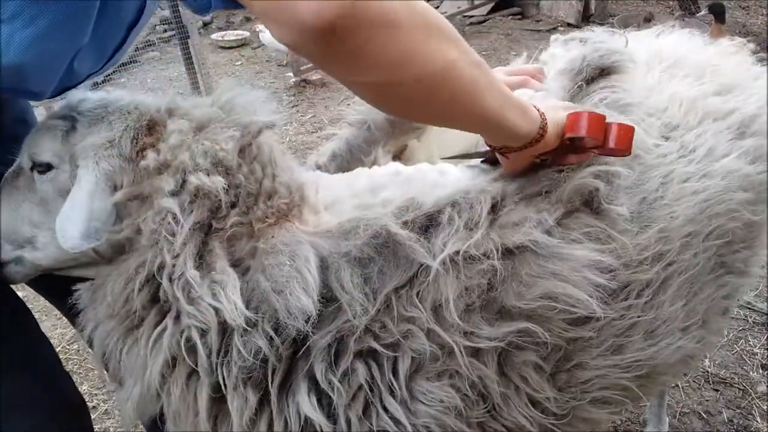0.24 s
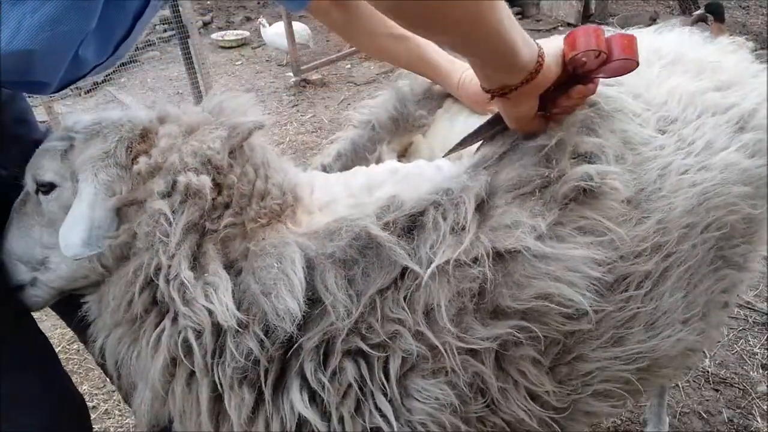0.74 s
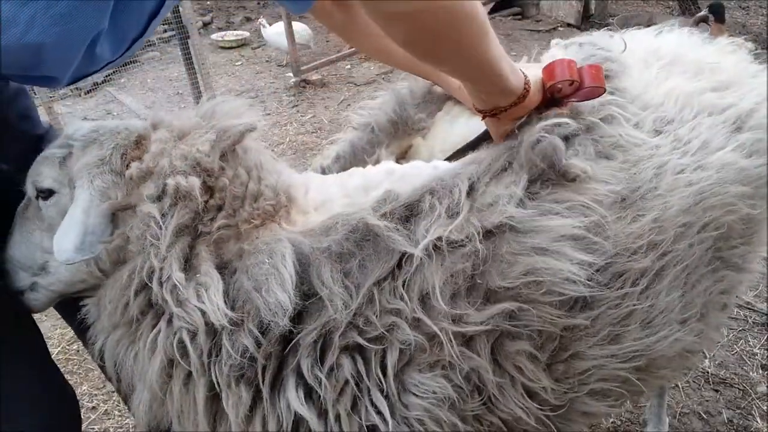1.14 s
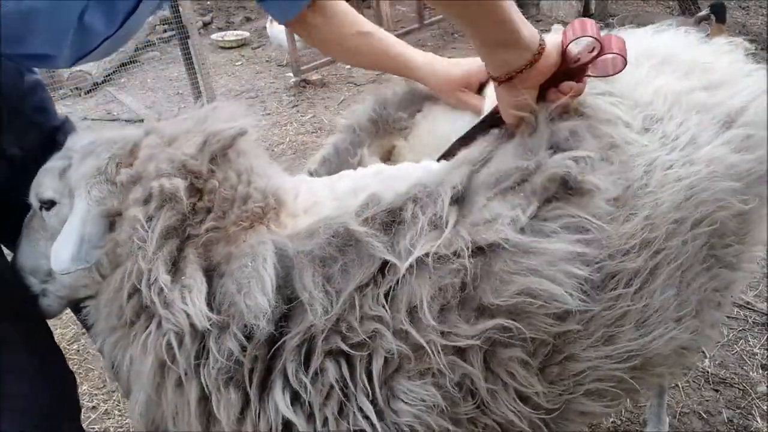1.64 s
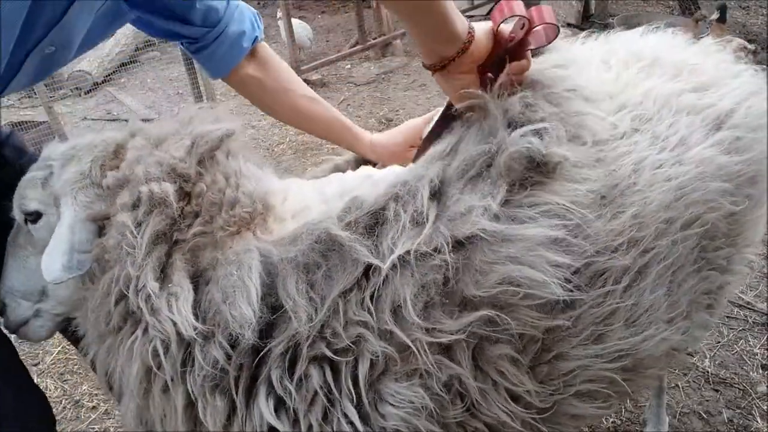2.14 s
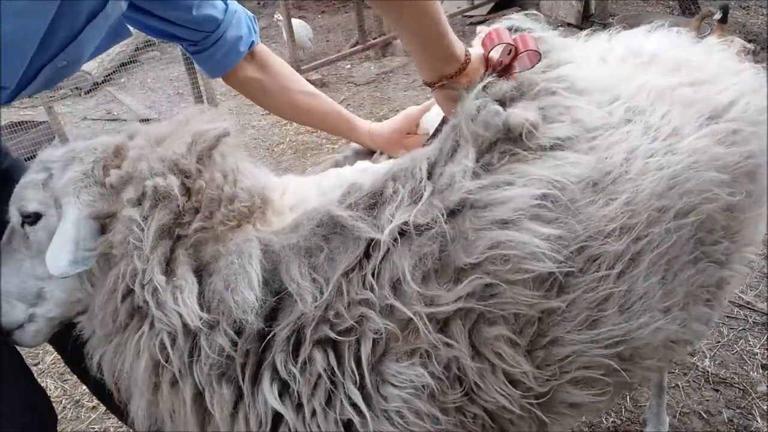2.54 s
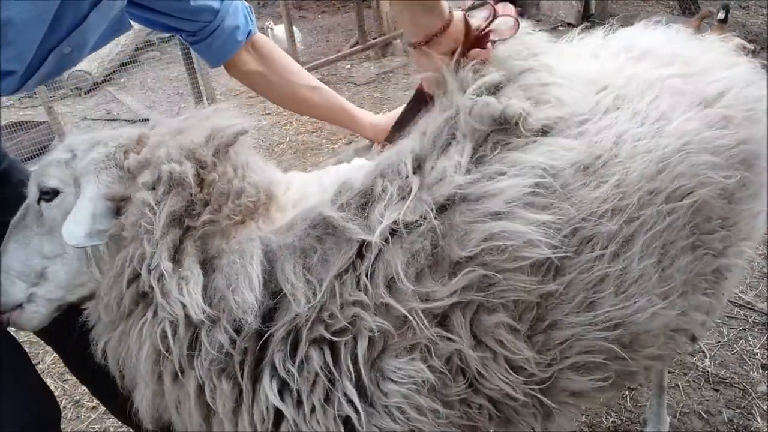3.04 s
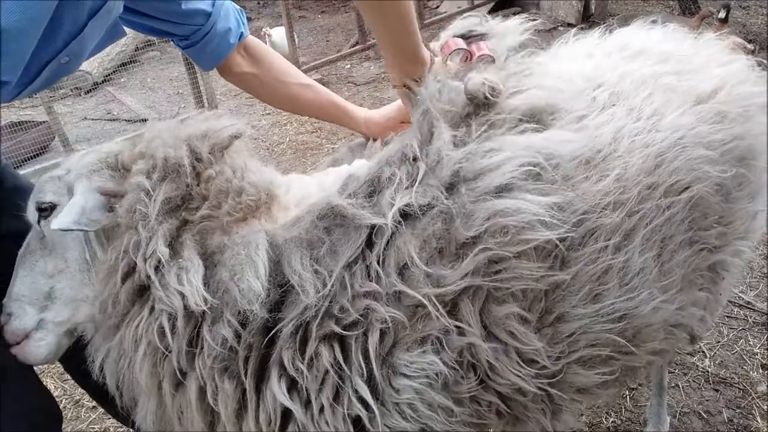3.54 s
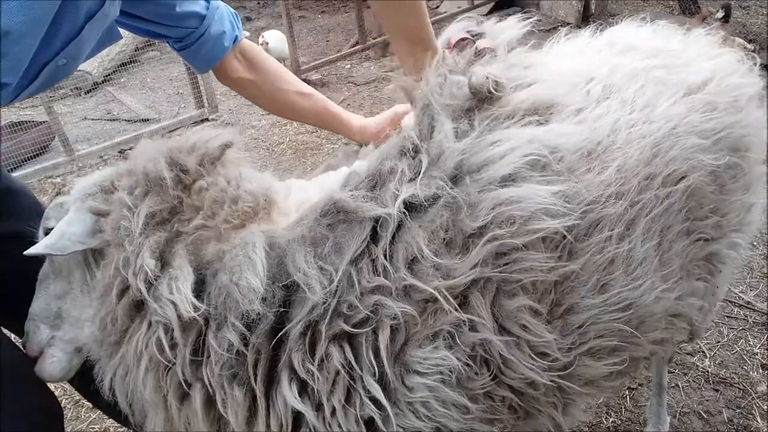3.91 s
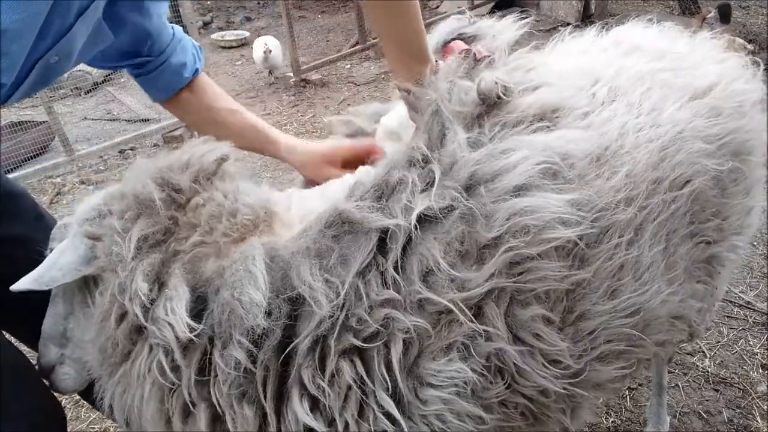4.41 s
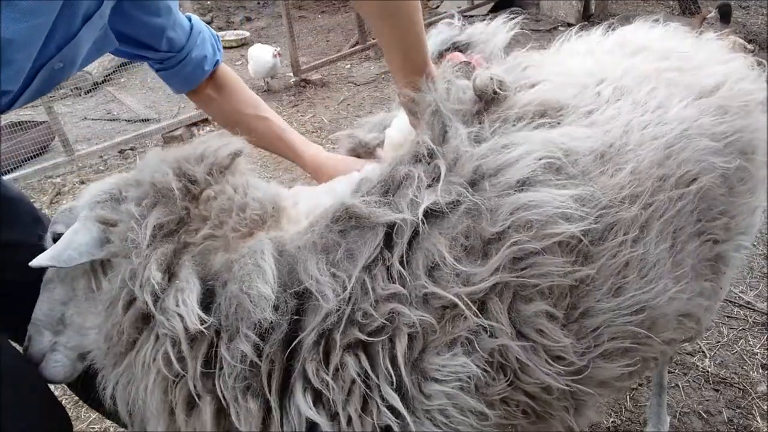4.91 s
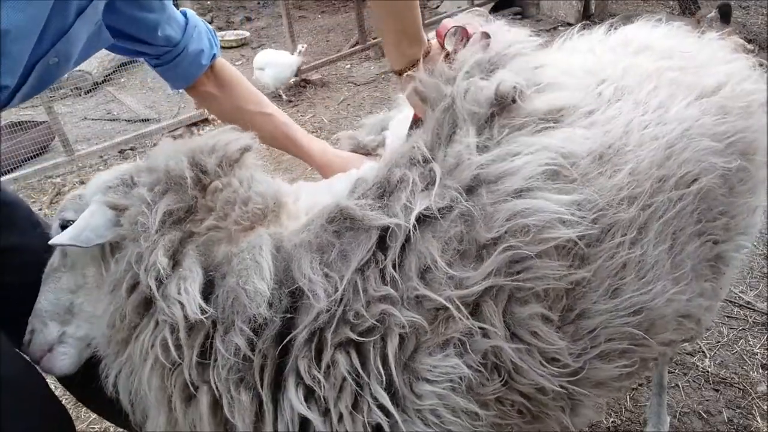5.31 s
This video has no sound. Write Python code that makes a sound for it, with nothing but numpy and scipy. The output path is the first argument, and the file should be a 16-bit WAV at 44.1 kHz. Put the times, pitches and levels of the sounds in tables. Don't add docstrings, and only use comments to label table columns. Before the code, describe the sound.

Close metallic shear snips and springy scrapes through thick fleece, soft wool rustle, low wind thumps and a few distant poultry calls outdoors.

```python
import sys
import numpy as np
from scipy import signal
from scipy.fft import rfft, irfft, next_fast_len
from scipy.io import wavfile
from scipy.ndimage import uniform_filter1d

SR = 44100
rng = np.random.default_rng(int(sys.argv[2]) if len(sys.argv) > 2 else 0)


def natural_amplitude(level_db):
    exponent = np.asarray(level_db, float) / 20
    return 10 ** exponent


def pcm_store(signal):
    levels = np.round(np.clip(np.atleast_2d(signal), -1, 1) * 32767)
    wavfile.write(sys.argv[1], SR, levels.astype(np.int16).T)


N = 245195


def evened(x):
    return x / np.sqrt(np.mean(x ** 2) + 1e-20)


def read(points, hz):
    f, value = np.transpose(points)
    return np.interp(np.log(hz + 1), np.log(f + 1), value)


def columns(rows, t):
    s, *rest = np.transpose(rows)
    return [np.interp(t, s, c) for c in rest]


def add(mix, s, sound):
    part = mix[max(round(s * SR), 0):][:len(sound)]
    part += sound[:len(part)]


def noise(n=N):
    return rng.standard_normal(n)


def butter(x, order, hz, kind="low"):
    return signal.sosfilt(signal.butter(order, hz, kind, fs=SR, output="sos"), x)


def colour(x, points):
    size = next_fast_len(len(x) + 512)
    gain = natural_amplitude(read(points, np.fft.rfftfreq(size, 1 / SR)))
    return irfft(rfft(x, size) * gain, size)[:len(x)]


def resonate(x, hz, width):
    turn = np.exp(2j * np.pi * np.cumsum(hz * np.ones(len(x))) / SR)
    r = np.exp(-np.pi * width / SR)
    return 2 * (turn * signal.lfilter([1 - r], [1, -r], x / turn)).real


def wander(per_s):
    return evened(butter(noise(), 2, per_s))


def patchy(x, patchy_db):
    z = signal.stft(x, nperseg=128)[2]
    patches = uniform_filter1d(rng.standard_normal(z.shape), size=2, axis=0)
    patches = uniform_filter1d(patches, size=6, axis=1)
    return signal.istft(z * natural_amplitude(patchy_db * evened(patches)), nperseg=128)[1][:len(x)]


def tilt(treble_db, bass_db):
    return [(2500, bass_db + 14), (4500, 0), (8000, 0), (10500, treble_db + 6)]


# [(f/Hz, width/Hz, level/dB)]
BLADES = [
    (0, [(2910, 92, -10), (4400, 77, -2.5), (6780, 88, 0), (7740, 23, 1.5), (8480, 39, -6.5), (12800, 53.6, -11), (14600, 50.5, -16)]),
    (1.3, [(4534, 80, 13.5), (5340, 80, 10), (6660, 37, 2), (10220, 105, 8), (12700, 80, -3)]),
    (1.36, [(2750, 164, -11), (3350, 77, -10), (5800, 55, -5), (7350, 54, 0), (8510, 37, -3), (14100, 87, -4)]),
    (2.7, [(5380, 74, 5), (6440, 109, -4), (10260, 140, -8), (13040, 160, -7)]),
    (2.83, [(2370, 200, -18.5), (3560, 69, 2), (6130, 83, -2), (7220, 88, -2), (13150, 47, -10), (14600, 220, -14)]),
    (3.7, [(4523, 59, 1), (5500, 64, 8), (7480, 43, -3.5), (10500, 80, -3), (12670, 64, -7.5), (15530, 63, -9.5)]),
    (4.9, [(2500, 52, -4), (4058, 52, -3), (5880, 117, -7.5), (6720, 163, -11), (8310, 52, -2), (12920, 240, -5.5), (14100, 48, -6.5)]),
]
# [(f/Hz, width/Hz, level/dB)]
OPEN_BLADES = [
    (.55, [(4530, 38, 2.5), (5588, 78, 0), (6380, 63, 0), (7135, 138, -0.5), (8430, 17, -1), (11100, 70, -10), (15620, 41, -12)]),
    (1.55, [(3450, 92, -3), (4424, 39, -5.5), (5337, 47, -5), (6856, 69, 2), (10620, 115, -8), (13000, 38, -13), (15620, 60, -1)]),
    (3.0, [(4450, 40, -14.5), (5400, 51, -6), (6807, 44, -1), (8460, 43, -10), (10200, 160, -11), (15620, 47, -23)]),
    (4.0, [(4230, 120, -5), (4976, 180, 7), (5265, 220, 4), (7900, 80, -12), (10300, 130, -15.5)]),
    (5.12, [(4536, 180, -5), (5268, 62, -7), (6846, 50, -2), (8330, 54, -11), (11000, 55, -18), (13020, 66, -14.5), (15370, 22, -3)]),
]


def ring(x, s, damping):
    modes = [m for start, m in sorted(BLADES + OPEN_BLADES) if start <= s][-1]
    return sum(natural_amplitude(db) * resonate(x, hz, damping * width) for hz, width, db in modes)


SETTLE_DB, SETTLE_T60_S = -22, 0.28
THINNING = 0.64


def slips(rows, rise_s, grain, steel_db, damping, ease):
    out = np.zeros(N)
    t = np.arange(round(.3 * SR)) / SR
    after = np.maximum(t - rise_s, 0)
    swell = np.minimum(t / rise_s, 1) ** ease
    settling = natural_amplitude(SETTLE_DB - 60 * after / SETTLE_T60_S)
    for s, db, treble_db, t60 in rows:
        unevenness = evened(uniform_filter1d(noise(len(t)), size=55))
        snaps = noise(len(t)) * natural_amplitude(1.9 * unevenness)
        shape = swell * (natural_amplitude(-60 * after / max(t60, .02)) + settling)
        force = colour(snaps, tilt(treble_db, -23.5 - THINNING * db)) * shape
        scrape = patchy(colour(force, grain), patchy_db=4.5)
        steel = ring(snaps * shape, s, damping)
        sound = (scrape + natural_amplitude(steel_db) * steel) / abs(scrape).max()
        add(out, s - rise_s - .001, natural_amplitude(db - 6.0) * sound)
    return out


# peak t/s, peak level/dB, treble/dB, t60/s
JERKS = [(0.3564, -28, -11, 0.28), (0.3932, -18.5, -9, 0.29), (0.421, -15, -5, 0.12),
         (0.438, -9.5, -19.5, 0.02), (1.339, -38.5, -11, 0.077), (1.3788, -30, -7.5, 0.054),
         (1.4008, -8.5, -11.5, 0.078), (2.803, -27, -45, 0.107), (2.844, -18.5, -12, 0.066),
         (2.867, -15.5, -7, 0.19), (2.8884, -11, -17.5, 0.047), (3.7859, -33, -6, 0.22),
         (3.8095, -30.5, -8.5, 0.18), (3.8326, -24.5, -8, 0.033), (4.9382, -37, -20, 0.073),
         (4.947, -29.5, -13.5, 0.34), (4.988, -23, -5.5, 0.095), (5.005, -6.5, -5.5, 0.028),
         (5.031, -15, -16.5, 0.15)]
# f/Hz, level/dB per Hz
SCRAPE = [(710, -69.5), (1200, -50), (3260, -16.5), (4380, -11), (4990, -10), (5390, -9.5), (6220, -10.5),
          (6940, -2.5), (9030, -19), (10300, -11), (11700, -14.5), (16000, -12), (16500, -36)]


def jerks():
    return slips(JERKS, .015, SCRAPE, steel_db=-3.0, damping=2.5, ease=1.6)


# peak t/s, peak level/dB, treble/dB, t60/s
SPRINGS = [
    (0.6026, -8.5, -7, 0.068),
    (1.5885, -17, -21.5, 0.029),
    (3.0475, 0.5, -9.5, 0.047),
    (4.0744, -30, -15.5, 0.079),
    (4.1071, -36.5, -15, 0.089),
    (5.170, -4.5, -6, 0.071),
]
# f/Hz, level/dB per Hz
SPRING_SCRAPE = [(710, -76.5), (1200, -51.5), (4390, -10.5), (5000, -14.5), (5390, 0.5), (6010, -18.5),
                 (6930, -6.5), (9500, -20.5), (16200, -18)]


def springs():
    return slips(SPRINGS, .013, SPRING_SCRAPE, steel_db=0.0, damping=1.14, ease=0.8)


NICK_DAMPING, NICK_T60_S = 1.5, .007
# t/s, peak level/dB, treble/dB, bass/dB
CLACKS = [
    (0.4258, 7.5, -13.5, -53.5),
    (0.4335, -14.5, -4, -17.5),
    (1.4019, 2, -20, -24.5),
    (2.891, 4.5, -5, -18),
    (2.9025, -16, -21, -12),
    (5.0207, 5, -10, -22.5),
    (5.026, -10, -18.5, -31),
]


def clacks():
    out, t = np.zeros(N), np.arange(round(.25 * SR)) / SR
    for s, db, treble_db, bass_db in CLACKS:
        blow = noise(len(t)) * natural_amplitude(-60 * t / .016)
        bass = [(300, bass_db - 18), (1300, bass_db - 11), (2100, 0)]
        crack = colour(blow, bass + tilt(treble_db, bass_db - 8)[1:])
        crack = crack * np.minimum(t * SR / 8, 1)
        knock = resonate(resonate(blow, 2300, 720), 2300, 720)
        steel = ring(blow, s, damping=NICK_DAMPING)
        sound = crack / abs(crack).max()
        sound += natural_amplitude(bass_db + 5) * knock / abs(knock).max()
        sound += natural_amplitude(-5.0) * steel / abs(steel).max()
        add(out, s - .001, natural_amplitude(db - 12.0) * sound)
    return out


# t/s, peak level/dB
NICKS = [(0.3618, -50), (0.399, -31), (0.406, -33), (0.4149, -24.5), (0.435, -2.5), (0.458, -22),
         (0.5941, -20), (0.6026, -16), (0.608, -22.5), (1.3362, -36), (1.3792, -36), (1.396, -23),
         (1.4085, -13), (1.412, -22), (1.5812, -20), (1.5912, -31), (2.809, -31), (2.841, -30),
         (2.8474, -28), (2.8684, -26), (2.9022, -15.5), (3.0383, -15), (3.0587, -19.5), (3.782, -44),
         (3.807, -36), (3.8153, -37.5), (3.831, -36), (4.0736, -30.5), (4.1053, -42.5), (4.9493, -35),
         (4.9636, -35), (4.986, -29), (5.0063, -13), (5.0292, -14.5), (5.166, -16)]


def nicks():
    out, t = np.zeros(N), np.arange(round(.1 * SR)) / SR
    for s, db in NICKS:
        blow = noise(len(t)) * natural_amplitude(-60 * t / NICK_T60_S)
        scrape = colour(blow, SCRAPE) * np.minimum(t * SR / 12, 1)
        sound = scrape + natural_amplitude(-1.0) * ring(blow, s, damping=NICK_DAMPING)
        add(out, s - .0007, natural_amplitude(db) * sound / abs(sound).max())
    return out


# t/s, peak level/dB, f/Hz, snap/dB
TICKS = [(.985, -45.5, 6550, -16), (1.206, -48.5, 10270, -23), (2.07, -38, 1700, -6.5),
         (2.8153, -22.5, 2920, -26), (3.502, -40, 5230, -13), (3.5134, -32, 2000, -33),
         (3.5623, -36, 4960, -14), (3.6384, -26, 5800, -14), (3.708, -37, 10070, -24),
         (3.9464, -47.5, 2060, -19.5), (3.986, -32.5, 2104, -23.5), (4.213, -27, 2230, -27.5),
         (4.397, -52, 9000, -9.5), (5.2827, -47.5, 6800, -6), (5.299, -45.5, 7040, -8),
         (5.348, -38, 5196, -21.5), (5.345, -37.5, 8250, -27)]
# t/s, peak level/dB, f/Hz, snap/dB
GRIT = [
    (1.6876, -37, 4000, -10),
    (1.7704, -34, 5420, -10),
    (1.8702, -41.5, 5800, -12),
    (2.1087, -46, 4000, -15.5),
    (2.1626, -30, 4200, -14),
]


def ticks(rows):
    out, t = np.zeros(N), np.arange(300) / SR
    for s, db, hz, snap_db in rows:
        snap = np.diff(noise(301)) * natural_amplitude(-60 * t / 0.001)
        core = np.sin(2 * np.pi * hz * t) * natural_amplitude(-60 * t / 0.005)
        add(out, s, natural_amplitude(db) * (natural_amplitude(snap_db) * snap + 0.3 * core))
    return out


CRISP_DB, CRISPING = -71.5, 1.1
# t/s, effort level/dB
RUSTLE = [(0.0, -65.5), (0.36, -71.5), (0.52, -60), (0.78, -71.5), (1.05, -68), (1.36, -70.5), (1.55, -62),
          (2.1, -64.5), (2.35, -60), (2.66, -60.5), (2.96, -61.5), (3.19, -63), (3.78, -64.5),
          (4.17, -66.5), (4.7, -73.5), (5.1, -63.5), (5.3, -71.5), (5.56, -68)]
# f/Hz, level/dB per Hz
FLEECE = [(1060, -33), (1800, -0.5), (3200, -4.5), (4220, -2.5), (7100, -5.5), (9200, -12.5), (15200, -11),
          (16000, -19.5), (16500, -34.5)]
# from t/s, to t/s, f/Hz, level/dB over the wool
SINGING = [(.03, .13, 10970, -8), (0, .16, 6700, -7), (.83, 1.2, 10980, -9), (.84, 1.08, 13400, -11),
           (.82, 1.25, 6800, -5), (.96, 1.2, 7750, -7), (2.3, 2.7, 10970, -14), (2.38, 2.76, 6600, -8),
           (3.15, 3.6, 5150, -7), (3.43, 3.6, 11000, -10), (2.3, 2.45, 13300, -15), (5.34, 5.56, 5150, -4),
           (5.2, 5.38, 6790, -5), (2.55, 2.7, 9650, -17)]


def rustle():
    t = np.arange(N) / SR
    body_db = columns(RUSTLE, t)[0]
    treble_db = CRISP_DB + CRISPING * (body_db + 62.5)
    flicker = natural_amplitude(1.6 * wander(30))
    wool = patchy(colour(noise() * flicker, FLEECE), patchy_db=2.0)
    treble = butter(wool, 8, 8800, "high")
    body = butter(wool, 5, [3000, 8600], "band")
    hum = np.zeros(N)
    for from_s, to_s, hz, db in SINGING:
        spell = uniform_filter1d(1. * ((from_s < t) & (t < to_s)), size=1500)
        hum += natural_amplitude(db) * spell * evened(resonate(noise(), hz, 85))
    return natural_amplitude(body_db) * (evened(body) + hum) + natural_amplitude(treble_db) * evened(treble)


# t/s, peak level/dB, length/s
SWEEPS = [
    (1.72, -32, 0.118),
    (2.176, -37.5, 0.17),
    (3.348, -40, 0.2),
    (3.872, -39.5, 0.11),
]
# t/s, peak level/dB, length/s
BRUSHES = [
    (1.678, -39, 0.034),
    (1.862, -39, 0.03),
    (1.97, -43, 0.074),
    (4.41, -47, 0.075),
]


def sweeps(rows):
    out = np.zeros(N)
    for s, db, length in rows:
        hiss = patchy(colour(noise(SR // 4), FLEECE), patchy_db=2.2)[:round(length * SR)]
        add(out, s, natural_amplitude(db - 21.5) * evened(hiss) * signal.windows.tukey(len(hiss), .5))
    return out


def fowl(calls, throat, rough, pitch_hz, sag):
    out = np.zeros(N)
    for s, db, length, gape_db, tone in calls:
        t = np.linspace(0, 1, round(max(length, .03) * SR))
        jitter, strength, hiss = rng.standard_normal((3, SR // 5))[:, :len(t)]
        gape = np.sin(np.pi * t) ** 2
        bend = tone * (1 + sag * (gape - .45 - 0.1 * t))
        shake = 1 + .035 * evened(uniform_filter1d(jitter, size=200))
        turns = np.cumsum(pitch_hz * bend * shake) / SR
        count = np.floor(turns)
        pulses = np.diff(count, prepend=0) * natural_amplitude(1.5 * strength + 3 * (-1) ** count)
        breath = np.exp(-(turns % 1) / 0.42) * hiss
        drive = (1 - rough) * evened(pulses) + rough * evened(breath)
        drive = drive * np.sin(np.pi * t) ** 0.79
        drive, gape, bend = (np.pad(v, (0, 800), "edge") for v in (drive, gape, bend))
        call = np.zeros(len(drive))
        for k, (hz, width, level_db) in enumerate(throat):
            band = resonate(drive, hz * bend, 1.9 * width)
            band = evened(resonate(band, hz * bend, width))
            if k > 1:
                band = band * natural_amplitude(gape_db) * gape
            call += natural_amplitude(level_db) * band
        add(out, s - .006, natural_amplitude(db + 2.5) * call / abs(call).max())
    return out


# t/s, peak level/dB, length/s, gape/dB, throat tuning factor
CACKLES = [(0.1094, -45, 0.081, 1.5, 0.95), (0.455, -43, 0.087, -3, 0.98), (0.546, -41.5, 0.064, 1, 0.89),
           (0.678, -42.5, 0.0807, 1, 0.99), (0.8005, -39, 0.09, -3, 1.007), (1.1455, -48, 0.06, 2.5, 0.97),
           (1.239, -45, 0.086, 0, 0.95), (1.353, -45.5, 0.062, -7, 0.98), (1.511, -46, 0.068, -2, 0.98),
           (1.8505, -40, 0.075, 2, 0.99), (2.0925, -39.5, 0.089, -1.5, 1.04),
           (2.3524, -41.5, 0.066, 0.5, 0.89), (2.5962, -37.5, 0.086, 5, 0.91),
           (2.6883, -38.5, 0.086, 5.5, 0.93), (2.9035, -38, 0.091, 0.5, 1.1),
           (3.0804, -37, 0.09, -0.4, 0.91), (3.3365, -35, 0.091, 2, 0.96), (3.5817, -43.5, 0.069, 6.5, 0.9),
           (3.788, -40.5, 0.089, 7, 0.946), (4.0223, -41, 0.07, -1, 0.9), (4.265, -38.5, 0.074, 0, 0.91)]
# f/Hz, width/Hz, level/dB
THROAT = [(1462, 97, -4.5), (1669, 150, 0.5), (2185, 96, -5.5), (2650, 200, -10.5), (3125, 190, -15),
          (5500, 620, -14.5)]


def cackles():
    return fowl(CACKLES, THROAT, rough=.3, pitch_hz=266, sag=.055)


# t/s, peak level/dB, length/s, gape/dB, throat tuning factor
CLUCKS = [
    (0.291, -43, 0.077, 6, 1.15),
    (0.608, -39.5, 0.059, 16, 0.88),
    (1.665, -39, 0.069, 7.5, 1.12),
    (2.001, -37, 0.065, 8.5, 1.015),
    (2.243, -45.5, 0.073, 5, 1.36),
]
# f/Hz, width/Hz, level/dB
CROP = [(623, 260, 0.5), (993, 180, 1), (1191, 130, -6.5), (2050, 690, -12.5), (3570, 900, -15)]


def clucks():
    return fowl(CLUCKS, CROP, rough=.95, pitch_hz=200, sag=.02)


# t/s, start f/Hz, end f/Hz, length/s, level/dB
CHIRPS = [
    (4.781, 6700, 4750, 0.0444, -47.5),
    (4.912, 5930, 4410, 0.0562, -39.5),
    (5.388, 7150, 5200, 0.02037, -50.5),
]


def chirps():
    out = np.zeros(N)
    for s, start_hz, end_hz, length, db in CHIRPS:
        hz = np.linspace(start_hz, end_hz, round(length * SR))
        hoarse = evened(resonate(resonate(noise(len(hz)), hz, 600), hz, 600))
        whistle = np.sin(2 * np.pi * np.cumsum(hz) / SR)
        add(out, s, natural_amplitude(db) * (0.21 * whistle + .5 * hoarse) * np.hanning(len(hz)))
    return out


# f/Hz, t60/s
PEN = [(1000, 0.21), (4000, 0.13), (8000, 0.036), (14000, 0.12)]


def pen(x):
    taps = np.zeros(SR // 2)
    at = np.arange(200, SR // 2 - 20, 20)
    taps[at + rng.integers(0, 20, len(at))] = rng.choice([-1., 1.], len(at))
    hz, t, z = signal.stft(taps, SR, nperseg=128)
    decay = natural_amplitude(-60 * t / read(PEN, hz)[:, None])
    tail = signal.istft(z * decay, SR, nperseg=128)[1]
    return signal.fftconvolve(x, tail / np.linalg.norm(tail))[:N]


GUST_RISE_DB_PER_S, EDGE_STEEPNESS = 401.5, 2.22
GUSTS = [(0.059, -28, 1.27, -19), (0.242, -25.5, 1.74, -15.5), (0.395, -26, 0.4, 5.5),
         (0.449, -28.5, 0.2, -3.5), (0.531, -41, 1.6, -36), (0.72, -39.5, 0.066, -40.5),
         (0.878, -39.5, 1.9, -23), (0.989, -24.5, 0.36, -17), (1.126, -15.5, 0.53, -1),
         (1.439, -19.5, 0.34, -14.5), (1.559, -31, 0.67, -18.5), (1.669, -32.5, 0.81, -13.5),
         (1.838, -28, 0.176, -32), (1.964, -20, 0.8, -14.5), (2.059, -24.5, 0.45, -6),
         (2.141, -23, 0.094, -18), (2.296, -19.5, 0.32, -18), (2.542, -22, 0.18, -29),
         (2.629, -20.5, 0.33, -21), (2.692, -15.5, 0.077, -30), (2.86, -40.5, 0.32, -10.5),
         (3.0, -34.5, 0.312, -29.5), (3.62, -54, 0.28, -41), (4.461, -47.5, 0.65, -32),
         (5.048, -37.5, 0.084, -9.5)]
# t/s, level/dB
BREEZE = [
    (0, -58),
    (2.7, -66),
    (3.5, -75),
    (3.8, -64.5),
    (4.4, -61),
    (4.9, -58),
    (5.56, -73.5),
]


def gusts():
    t = np.arange(N // 64 + 2) * 64 / SR
    s, db, t60, sharp_db = np.transpose(GUSTS)[:, :, None]
    slope_db = np.minimum(GUST_RISE_DB_PER_S * (t - s), -60 * (t - s) / t60)
    each = natural_amplitude(db + slope_db)
    sharp = natural_amplitude(db + sharp_db + EDGE_STEEPNESS * slope_db)
    breeze = natural_amplitude(columns(BREEZE, t)[0])
    push = np.sqrt(breeze ** 2 + (each ** 2).sum(0))
    edge = np.sqrt((natural_amplitude(-10.0) * breeze) ** 2 + (sharp ** 2).sum(0))
    return [np.interp(np.arange(N) / SR, t, v) for v in (push, edge)]


# f/Hz, level/dB per Hz
WIND = [(20, -41), (63, 4.5), (119, 5.5), (318, -10), (393, -12), (479, -23), (583, -24.5), (906, -52.5),
        (1000, -37.5), (1300, -69), (2200, -120)]


def wind():
    push, edge = gusts()
    lumps = natural_amplitude(2.5 * wander(53))
    swing = colour(noise(), WIND)
    low = evened(butter(swing, 4, 250))
    high = evened(butter(swing, 4, 250, "high"))
    deep = butter(noise(), 4, 85)
    out = natural_amplitude(-6.0) * push * evened(low * lumps)
    out += natural_amplitude(-1.5) * edge * evened(high * lumps ** 1.9)
    out += push ** 0.486 * natural_amplitude(-32.0) * evened(deep * lumps)
    return out


BUFFET_TURNS = 2.6
# peak t/s, peak level/dB, f/Hz
BUFFETS = [(0.0668, -21.5, 144), (0.0952, -29, 112), (0.151, -24, 121), (0.2034, -36, 122),
           (0.2312, -25, 172.2), (0.2493, -20.5, 171), (0.2723, -22.5, 151), (0.306, -26.5, 175),
           (0.3232, -36, 133), (0.3788, -20.5, 112), (0.3958, -39, 210), (0.4198, -15.5, 183),
           (0.4507, -13.5, 177), (0.4806, -24.5, 136), (0.499, -30, 134), (0.5253, -23.5, 140),
           (0.5504, -31.5, 115), (0.6602, -36, 100), (0.7258, -32, 108.4), (0.8405, -33, 132.6),
           (0.9719, -26, 119.3), (1.0092, -23.5, 142.4), (1.0391, -41, 101.5), (1.0562, -24.5, 158.6),
           (1.1125, -16, 159), (1.1443, -11.5, 220.6), (1.1647, -12.5, 218), (1.2207, -21.5, 162.7),
           (1.237, -26, 142), (1.267, -20.5, 131), (1.355, -30, 126.2), (1.4316, -20, 215.4),
           (1.4776, -18.5, 160), (1.495, -27, 112), (1.6683, -18.5, 112), (1.6931, -28.5, 120),
           (1.771, -28, 85), (1.836, -23.5, 110), (1.9066, -22.5, 141), (1.923, -29.5, 128),
           (1.9681, -17.5, 109), (1.9947, -20, 130.3), (2.017, -26, 135), (2.0414, -19, 142),
           (2.0593, -24, 161), (2.1095, -23.5, 144), (2.139, -18.5, 165), (2.2618, -19.5, 123),
           (2.3184, -17, 166), (2.3524, -23.5, 186.4), (2.3952, -31, 115), (2.5401, -24.5, 228),
           (2.595, -24.5, 155.2), (2.6323, -12, 135), (2.6653, -15.5, 143), (2.691, -20.5, 142),
           (2.7174, -25.5, 144), (2.858, -35, 115), (2.9985, -20, 133.7), (3.0673, -36, 100.3),
           (3.123, -56.5, 89), (3.22, -47.5, 100), (3.322, -44, 78.4), (3.395, -54, 75), (3.6129, -43.5, 88),
         (3.6594, -44, 116), (3.8379, -49, 162), (3.906, -54, 99), (4.09, -51, 109), (4.145, -46, 102),
         (4.2494, -47.5, 98), (4.3106, -53.5, 108.3), (4.3983, -50.5, 85.2), (4.4575, -34.5, 79.6),
         (4.544, -34, 79.02), (4.66, -43.5, 106.6), (4.7537, -51.5, 88.3), (4.801, -53, 109),
         (4.948, -51, 108), (4.9898, -44, 99), (5.0332, -35, 133), (5.122, -49, 90.2), (5.3653, -49, 79)]


def buffets():
    out = np.zeros(N)
    for s, db, hz in BUFFETS:
        u = np.linspace(0, 1, round(BUFFET_TURNS / hz * SR))
        eddy = np.sin(2 * np.pi * (BUFFET_TURNS * u ** 0.78 + rng.random()))
        eddy = eddy * np.sin(np.pi * u ** 0.57) ** 2.7
        add(out, s - .4 * len(u) / SR, natural_amplitude(db) * eddy)
    return out


# t/s, peak level/dB
CRACKLES = [
    (1.11, -20),
    (1.14, -12),
    (1.163, -20),
    (1.18, -20.5),
    (1.26, -34.5),
    (1.435, -36),
]


def crackles():
    out = np.zeros(N)
    u = np.linspace(0, 1, 124)
    flick = np.sin(2 * np.pi * 0.79 * u) * np.sin(np.pi * u) ** 2
    for s, db in CRACKLES:
        add(out, s - .001, natural_amplitude(db + 3.0) * flick)
    return out


# f/Hz, level/dB per Hz
AIR = [(24, -32.5), (40, 0), (85, 4.5), (406, -6), (608, -6.5), (1840, -28.5), (2970, -35), (5180, -26.5),
       (9240, -32), (14900, -37.5), (16500, -55.5)]
AIR_DB = -64
# t/s, level/dB
YARD = [(0, -57.5), (.6, -70), (.97, -71.5), (1.2, -64), (2.15, -57.5), (2.34, -59.5), (2.47, -74),
        (2.62, -58), (3.26, -64.5), (3.5, -64.5), (3.95, -69), (4.2, -58), (4.55, -66.5), (5.0, -64.5),
        (5.4, -72.5), (5.56, -72.5)]


def air():
    floor = natural_amplitude(AIR_DB) * evened(colour(noise() * natural_amplitude(1.8 * wander(24)), AIR))
    yard = evened(patchy(butter(noise(), 2, [550, 1700], "band"), patchy_db=1.5))
    yard_db = columns(YARD, np.arange(N) / SR)[0]
    return natural_amplitude(0.75 * (yard_db + 64.5)) * floor + natural_amplitude(yard_db - 4.0) * yard


def scene():
    shears = jerks() + springs() + clacks() + nicks() + ticks(TICKS)
    fleece = rustle() + sweeps(SWEEPS) + sweeps(BRUSHES) + ticks(GRIT)
    birds = cackles() + clucks()
    small_bird = chirps()
    echoes = pen(natural_amplitude(-12.0) * shears + natural_amplitude(-8.5) * birds + small_bird)
    weather = wind() + buffets() + crackles() + air()
    return (shears + fleece + birds + small_bird + echoes + weather)[None]


def roll_off(x):
    return signal.sosfilt(signal.butter(12, 16970, fs=SR, output="sos"), x)


def record(dry):
    edge_hz = 15800
    firm = butter(dry, 6, 46, "high")
    lowpass = signal.firwin(301, edge_hz, window=("kaiser", 7), fs=SR)
    cut = signal.oaconvolve(firm, lowpass[None], "same")
    return roll_off(cut)


dry = scene()
out = record(dry)
pcm_store(out)
```